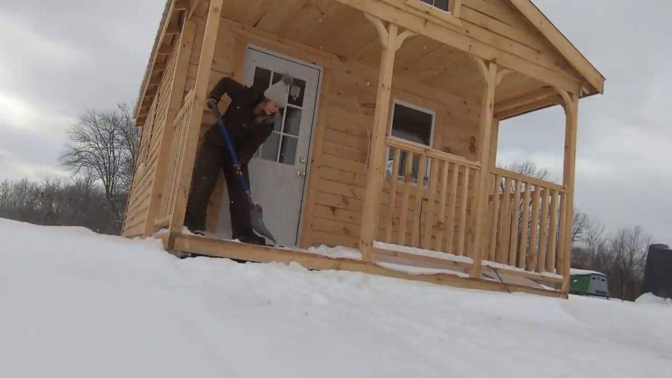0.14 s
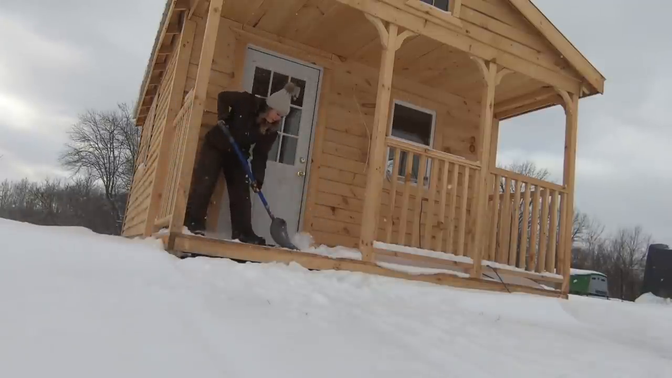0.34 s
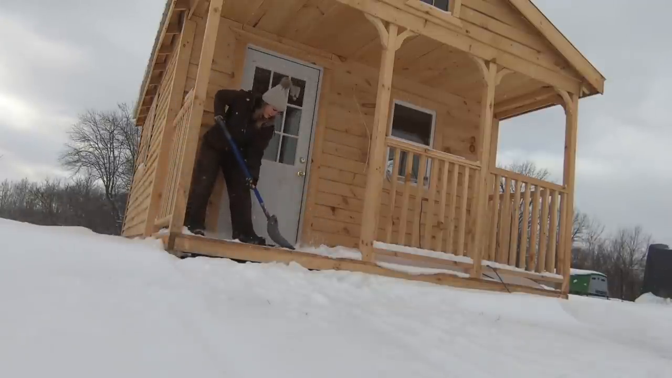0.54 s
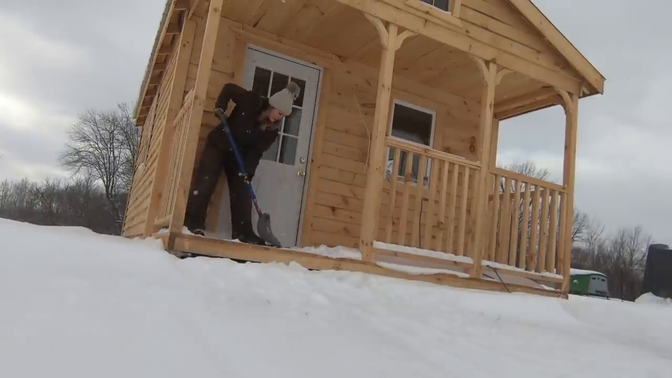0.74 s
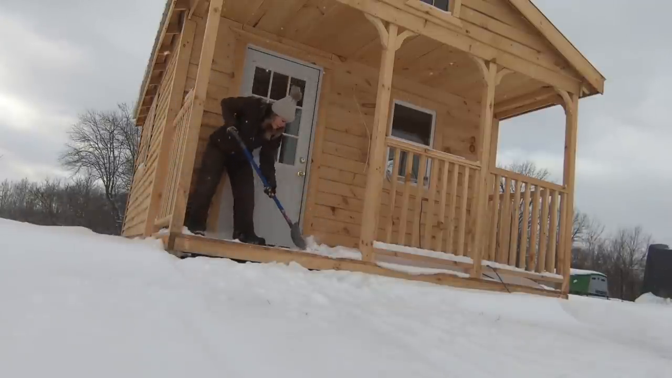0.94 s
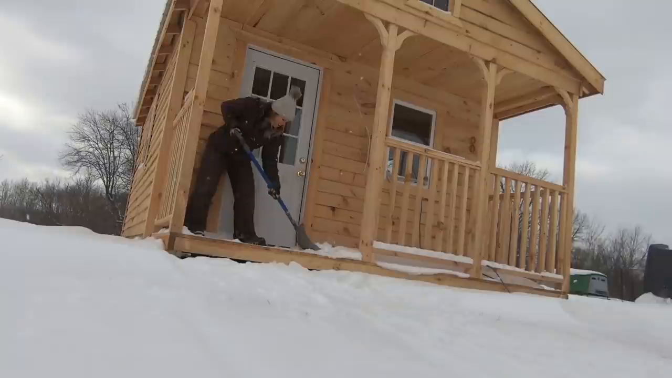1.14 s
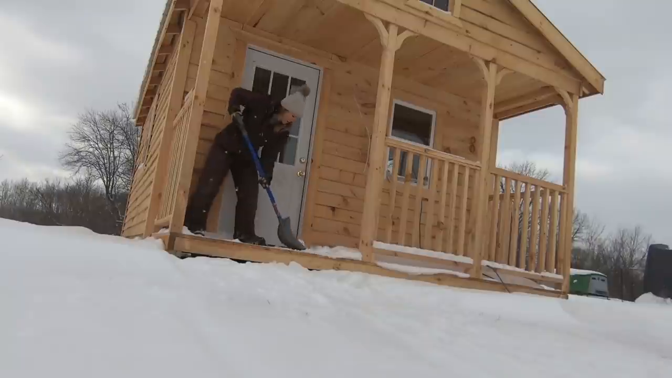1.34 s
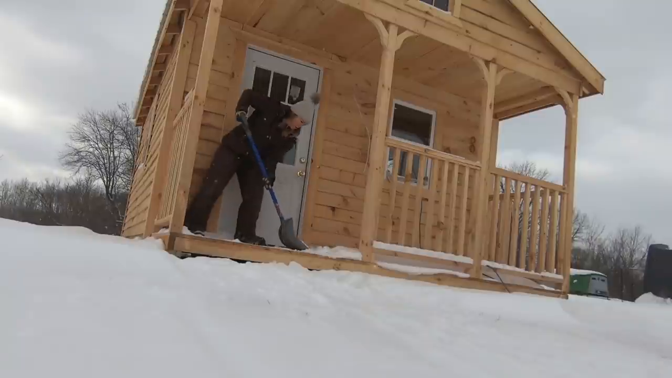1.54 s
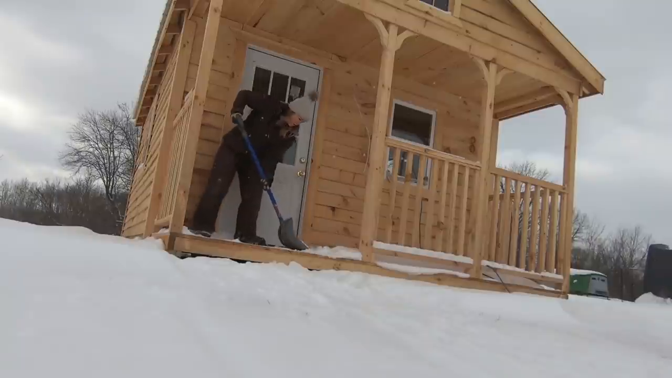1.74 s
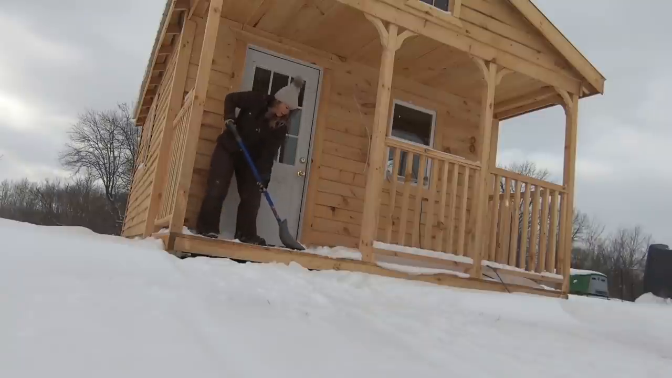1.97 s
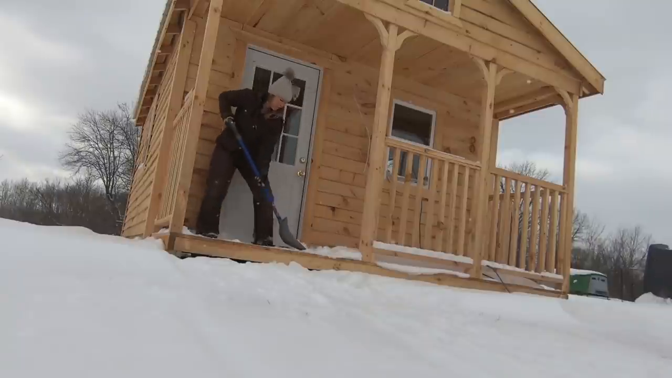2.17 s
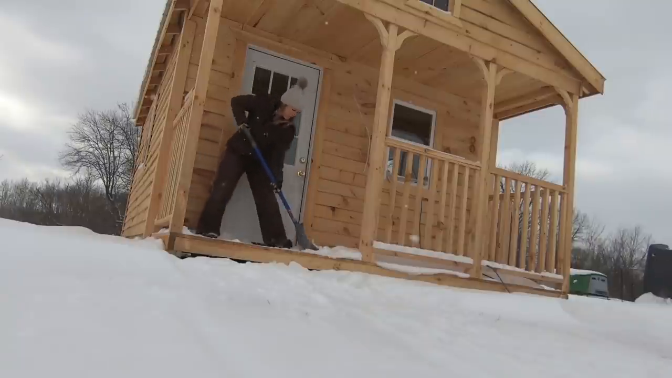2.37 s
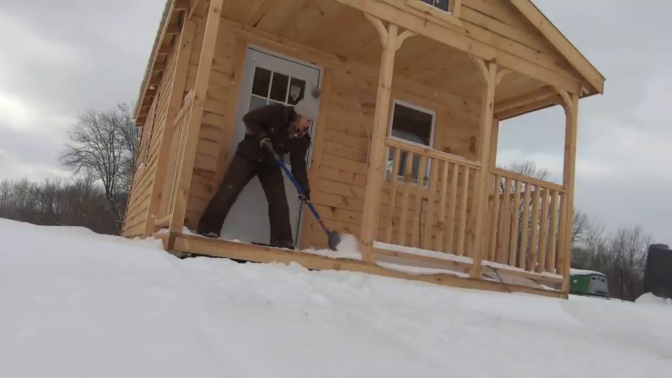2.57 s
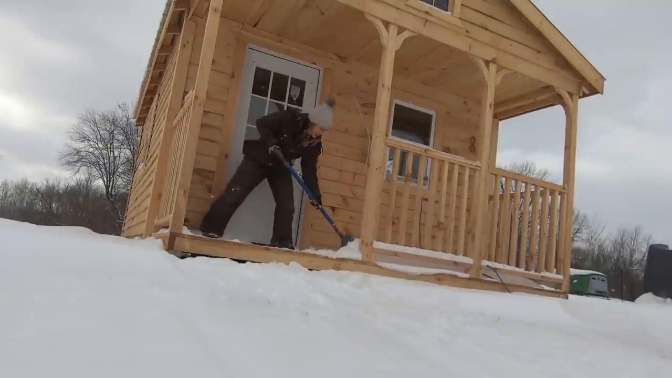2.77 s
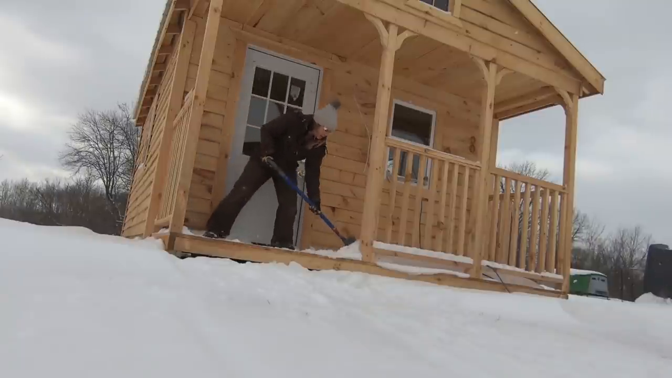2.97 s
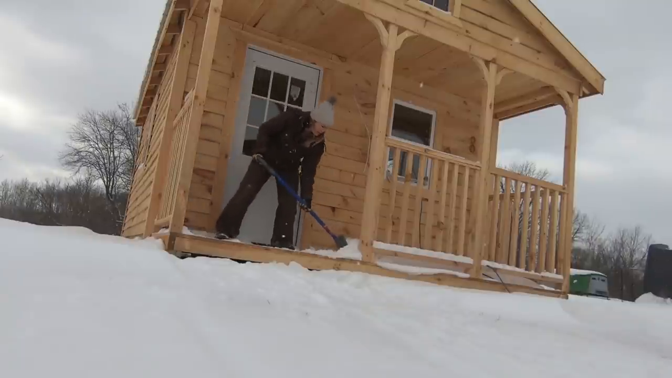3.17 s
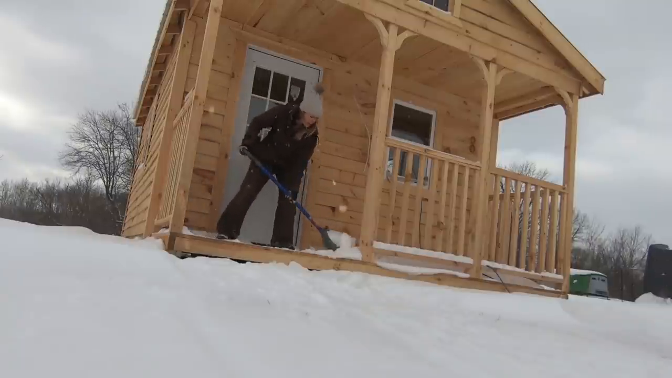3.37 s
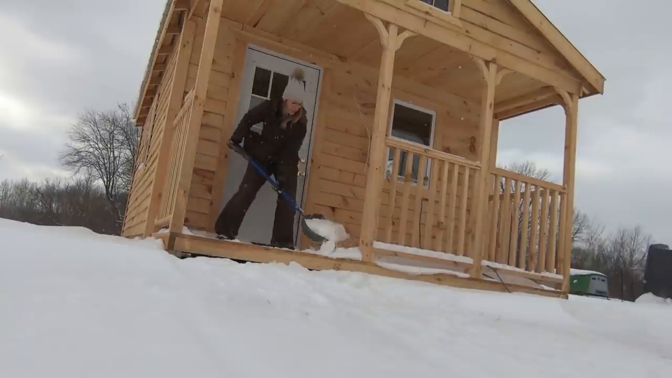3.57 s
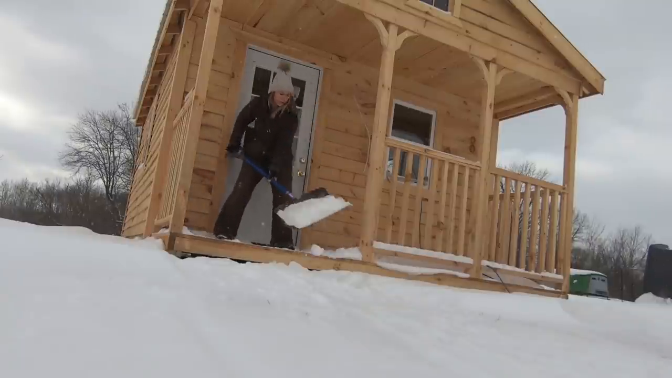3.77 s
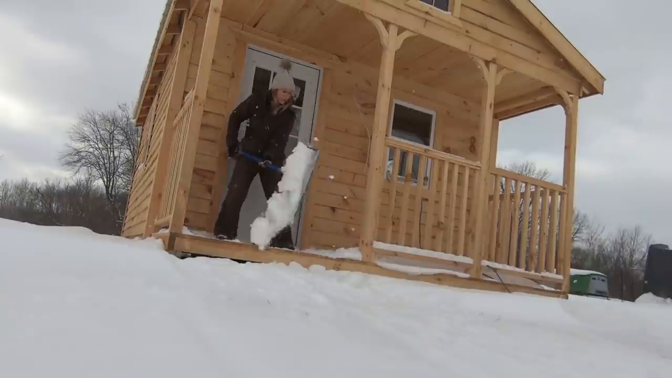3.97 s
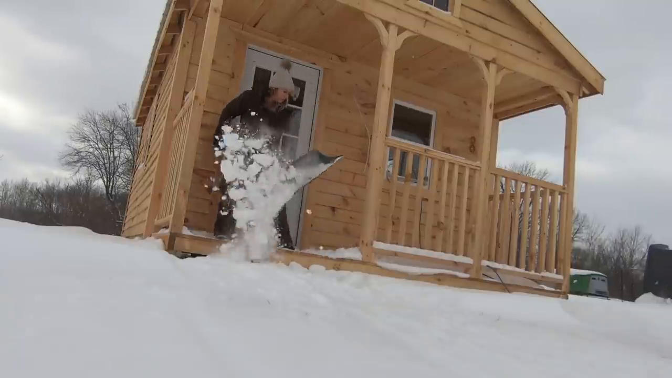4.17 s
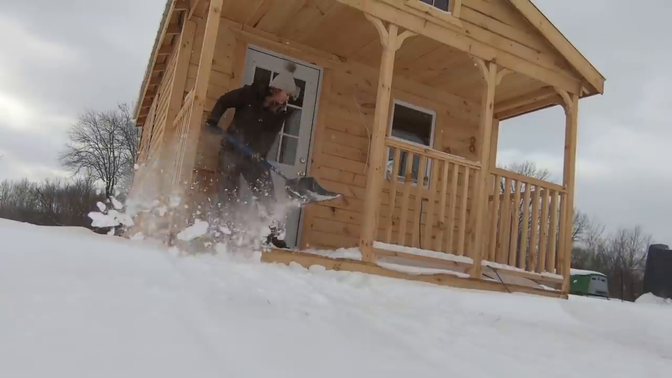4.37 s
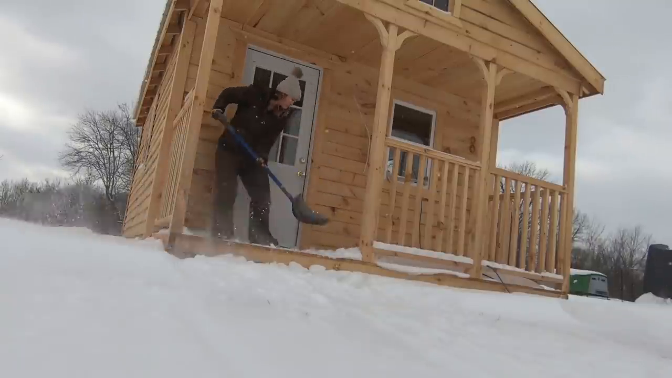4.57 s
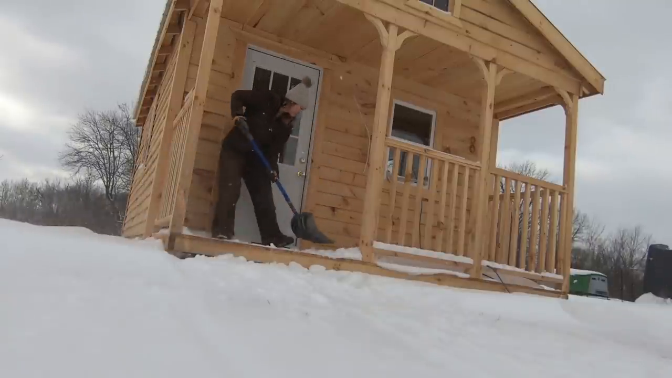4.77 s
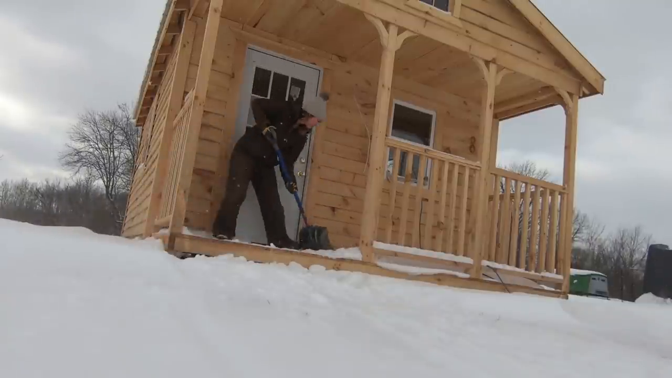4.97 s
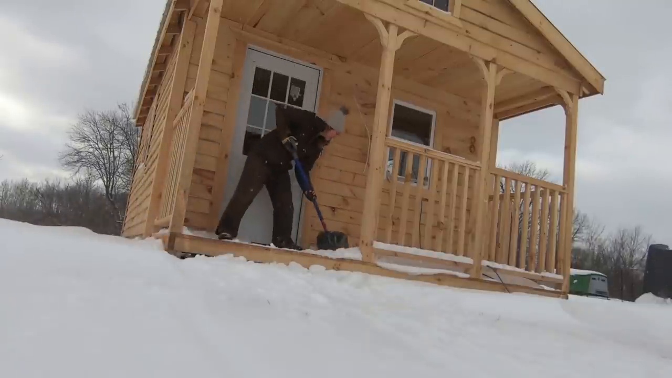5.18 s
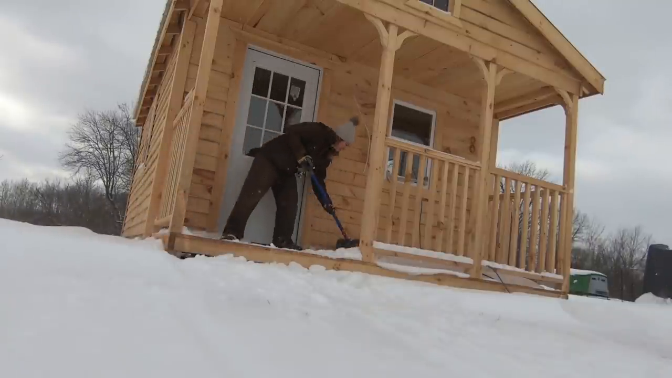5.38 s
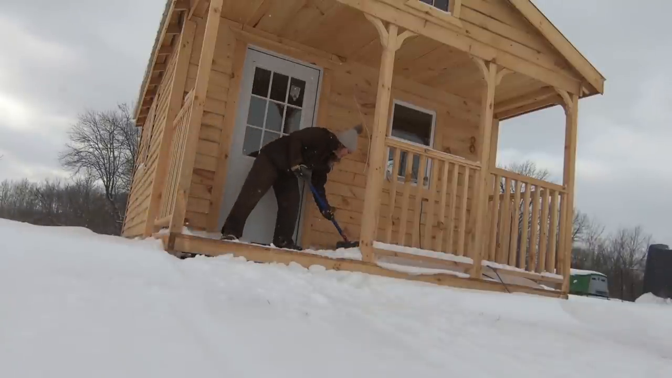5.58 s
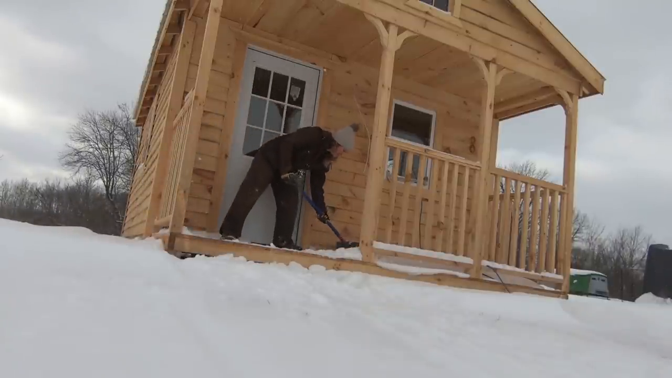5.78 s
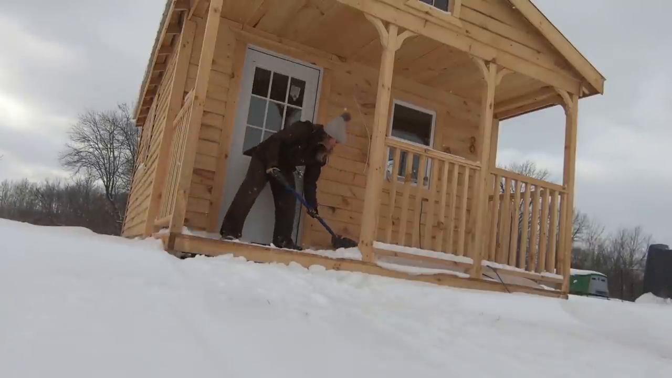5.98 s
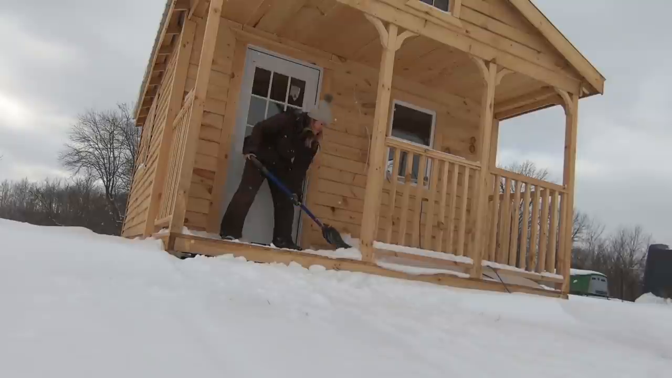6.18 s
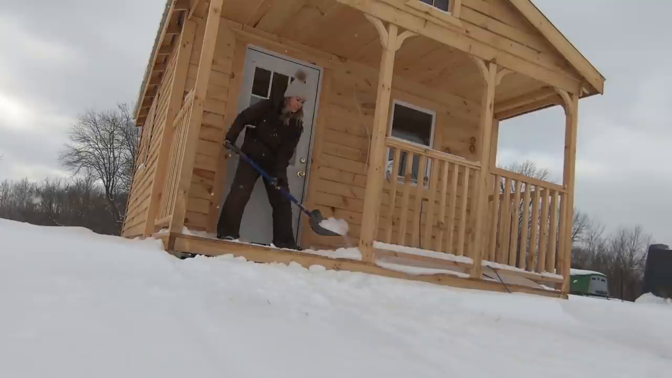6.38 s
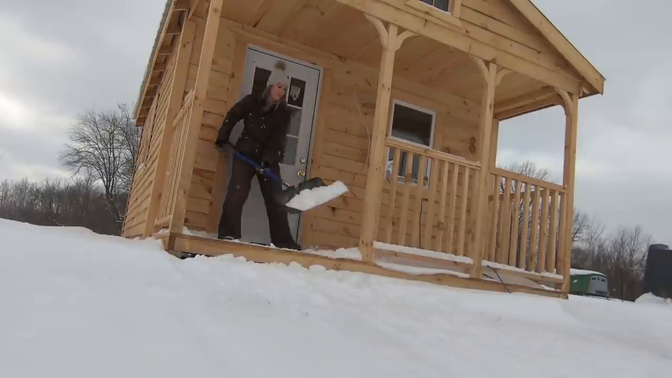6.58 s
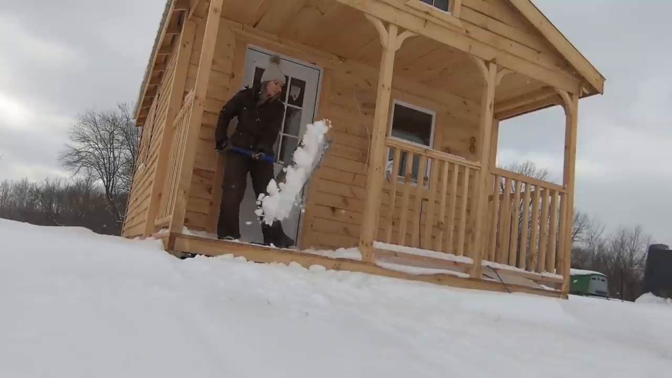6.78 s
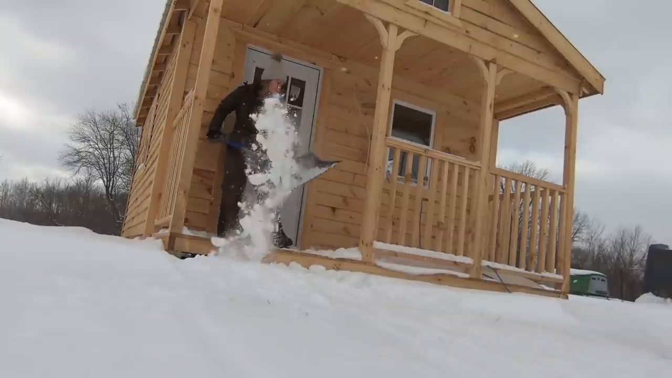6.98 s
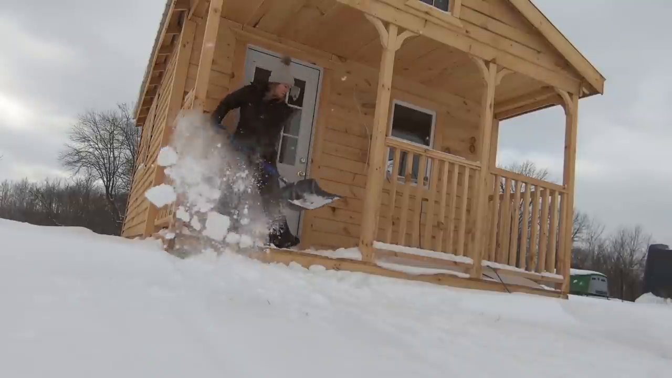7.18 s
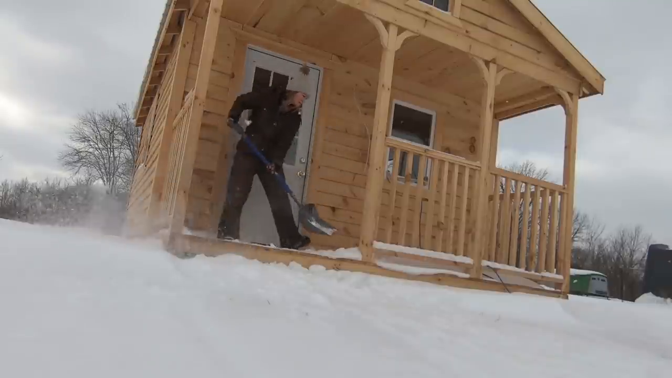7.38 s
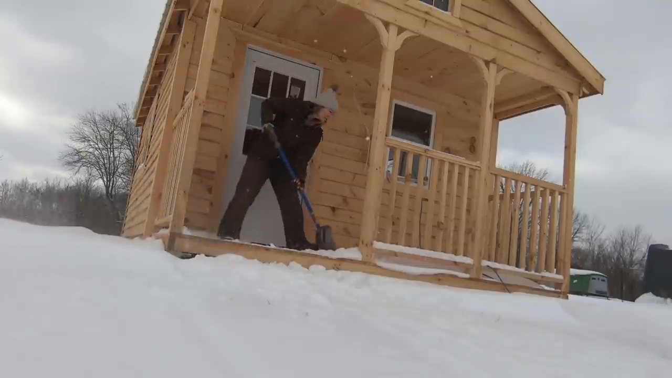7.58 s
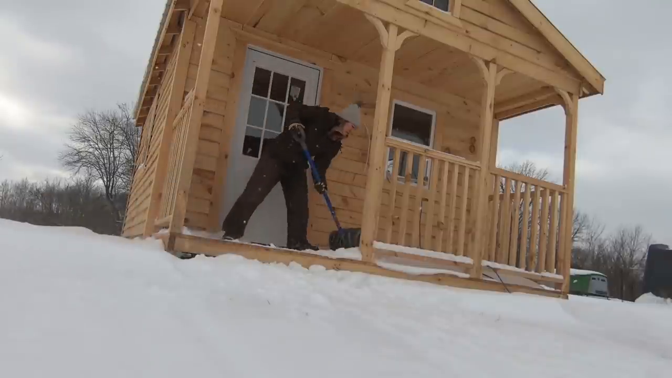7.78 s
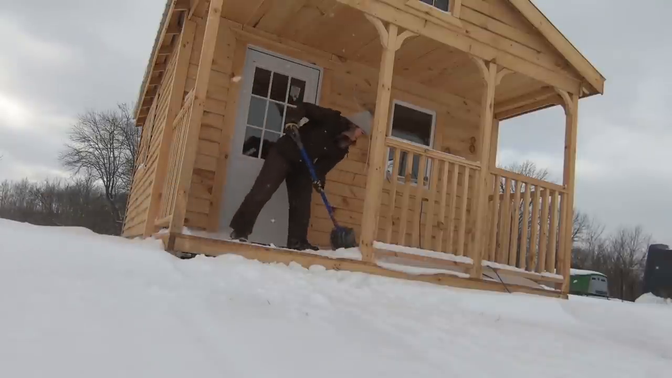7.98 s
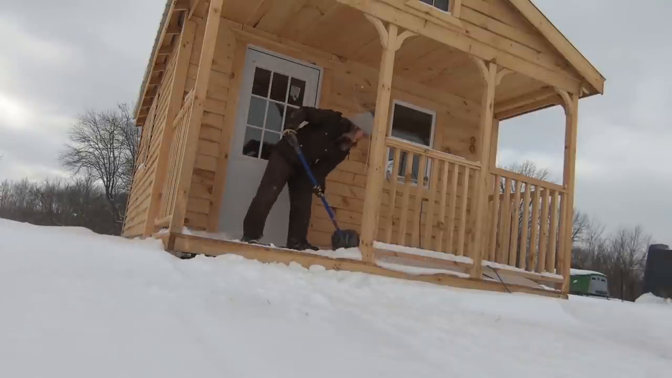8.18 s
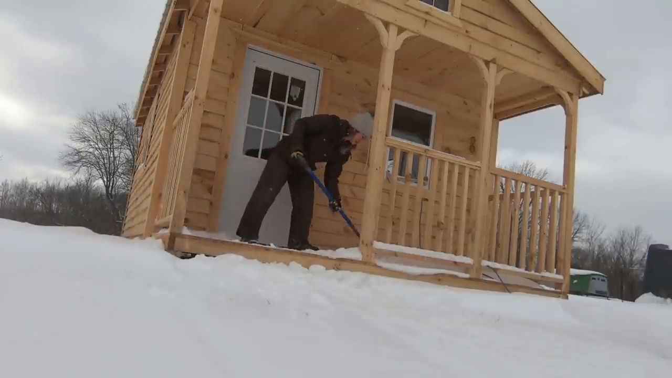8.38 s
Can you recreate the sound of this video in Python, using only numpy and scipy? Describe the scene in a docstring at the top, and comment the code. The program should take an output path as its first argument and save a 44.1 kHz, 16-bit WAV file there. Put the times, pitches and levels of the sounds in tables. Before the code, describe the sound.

Gritty shovel scrapes and woody thumps on a small porch, quiet gaps as snow is thrown, a faint distant engine hum behind.

```python
"""A snow shovel is pushed along the boards of a small wooden porch, heard from the snow below.
Crust crunches under the blade as dense random grains, coloured by faint blade and scoop resonances;
the hollow deck drums and knocks in damped modes of boards and joists, and crust and grit snap.
A far hum and engine drone, shaped noise and wavering harmonics, hang over the fields, and at first
a breeze brushes the microphone as lumpy low noise."""
import sys
import numpy as np
from scipy import signal
from scipy.fft import rfft, irfft, next_fast_len
from scipy.io import wavfile
from scipy.ndimage import uniform_filter1d

SR = 44100
rng = np.random.default_rng(int(sys.argv[2]) if len(sys.argv) > 2 else 0)


def digitize_waveform(pressure):
    """Quantize a signal to 16-bit integers and store it at the path in sys.argv[1].

    Rows of a 2-D input are taken as channels; values are limited to [-1, 1].
    """
    field = np.atleast_2d(pressure).T
    bounded = np.clip(field, -1, 1)
    quanta = np.round(bounded * 32767).astype(np.int16)
    wavfile.write(sys.argv[1], SR, quanta)


N = 371497  # length in samples


def gain_of(db):
    """Amplitude factor of a level in dB."""
    return 10 ** (np.asarray(db) / 20)


def evened(x):
    """Scale to an RMS of 1."""
    return x / np.sqrt(np.mean(x ** 2) + 1e-20)


def peaked(x):
    """Scale to a peak of 1."""
    return x / abs(x).max()


def read(points, hz):
    """Read a spectrum table between its points on a logarithmic frequency axis."""
    f, value = np.transpose(points)
    return np.interp(np.log(hz + 1), np.log(f + 1), value)


def follow(rows, t):
    """Follow each column of a time table in straight lines."""
    s, *columns = np.transpose(rows)
    return [np.interp(t, s, c) for c in columns]


def add(mix, s, sound):
    """Lay a sound into the mix from s seconds on, cut at the end."""
    part = mix[round(s * SR):][:len(sound)]
    part += sound[:len(part)]


def band(noise, order, edges_hz):
    """Band-pass a noise between two edges."""
    return signal.sosfilt(signal.butter(order, edges_hz, "band", fs=SR, output="sos"), noise)


def grit(per_s, spread_db):
    """Random tiny impacts; most are small, a few large."""
    size = gain_of(spread_db * np.minimum(rng.exponential(1, N), 5))
    struck = rng.standard_normal(N) * (rng.random(N) < per_s / SR)
    return evened(size * struck)


# snow crust crushed under the edge, relative spectrum: [f/Hz, level/dB per Hz]
CRUNCH = [(160, -13), (280, 1), (380, -6), (479, -5.5), (820, -2.5), (1190, -4), (2570, -7), (3300, -5.5),
          (6400, -18.5), (7900, -29), (9050, -30.5), (11500, -42), (15500, -50)]
# blade resonances: [f/Hz, width/Hz, level over the crunch at a ringing of 1/dB]
BLADE = [(1220, 70, 4.5), (1930, 50, 2.5), (3280, 110, 3)]
# the hollow of the scoop sings while pressed flat: [start t/s, end t/s, first f/Hz, last f/Hz]
SCOOP = [(0.246, .33, 1256, 1203), (5.363, 5.48, 1506, 950), (5.669, 5.79, 1158, 1102),
         (7.75, 7.8, 850, 800)]
SCOOP_DB, SCOOP_WIDTH_HZ = 5.5, 280
RINGING, RINGING_PER_DB = 1.2, .06  # freedom to ring at -45 dB; harder strokes ring more
LIFTED_RINGING = 0.25  # share of the ringing left to the loaded blade in the air
LOOSE_HZ, LOOSE_DB = 2330, 3.5  # snow sliding off the lifted blade gathers around one broad band


def scraping():
    """Crystals crush under the edge; the snow that loads the blade tilts the colour and damps its modes."""
    grains = grit(per_s=14000, spread_db=1.0) + 0.28 * grit(per_s=900, spread_db=1.0)
    hz, t, z = signal.stft(grains, SR, nperseg=1024, noverlap=896)
    level_db, tilt_db = contacts(t)[:2]

    ringing = np.clip(RINGING + RINGING_PER_DB * (level_db + 45), 0, 2.5)
    ringing *= 1 - (1 - LIFTED_RINGING) * lifted(t)
    modes_db = sum(db / (1 + (2 * (hz - f) / width) ** 2) for f, width, db in BLADE)
    octaves = np.log2((hz + 100) / (hz + 5000) * 3)  # the tilt flattens at both ends
    colour_db = read(CRUNCH, hz)[:, None] + np.outer(modes_db, ringing) + np.outer(octaves, tilt_db)
    loose_db = LOOSE_DB * np.exp(-np.log2((hz + 1) / LOOSE_HZ) ** 2)
    colour = gain_of(colour_db + np.outer(loose_db, lifted(t)))
    for a, b, first_hz, last_hz in SCOOP:
        glide_hz = np.interp(t, [a, b], [first_hz, last_hz])
        off = 2 * (hz[:, None] - glide_hz) / SCOOP_WIDTH_HZ
        colour *= gain_of(SCOOP_DB * ((t > a) & (t < b)) / (1 + off ** 2))
    colour /= np.sqrt((colour ** 2).mean(0))  # colour alone, no level

    # the contact point wanders: patches in frequency and time
    patches = uniform_filter1d(rng.standard_normal(z.shape), 7, 0)
    patches = evened(uniform_filter1d(patches, 10, 1))
    z = z * colour * gain_of(1.87 * patches)
    crunch = signal.istft(z, SR, nperseg=1024, noverlap=896)[1][:N]
    stutter = evened(uniform_filter1d(rng.standard_normal(N), 400))  # the edge catches and slips
    return gain_of(at_samples(count=0) + 1.02 * stutter) * evened(crunch)


# each contact of blade, boot or loose snow:
# [start t/s, rise/s, level/dB, hold/s, change over the hold/dB, brightness/dB per octave]
STROKES = [(0, 0.0025, -66.5, 0.24, -18, -3.5), (0.243, 0.03, -25.5, 0.11, -14, .5),
           (0.439, 0.021, -60.5, 0.084, 4.5, 2), (0.706, 0.008, -50.5, 0.14, -10, 2),
           (0.777, 0.02, -32, 0.035, -1.5, 1.5), (0.818, 0.049, -28, 0.22, -22, 1.5),
           (1.07, 0.097, -55.5, 0.13, -6, 0.5), (1.344, 0.013, -48.5, 0.11, 1.5, 2.5),
           (1.447, 0.024, -34, 0.08, -16, 1.5), (1.524, 0.016, -48.5, 0.092, 0.5, -9.5),
           (1.801, 0.0023, -59.5, 0.15, 14, 0.5), (1.93, 0.14, -51, 0.073, -8.5, -2.5),
           (2.303, 0.0053, -46, 0.048, -20.5, -0.5), (2.372, 0.11, -49, 0.0083, 0, 1),
           (2.434, 0.038, -33, 0.16, -8.5, 2), (2.637, 0.021, -42.5, .31, -10, .5),
           (2.975, 0.018, -58.5, 0.15, 5.5, 2.5), (3.154, 0.061, -59.5, 0.11, -12, 6),
           (3.42, 0.038, -76.5, 0.11, 2.5, 2.5), (3.588, 0.021, -61.5, 0.013, -3.5, 3),
           (3.679, 0.01, -61.5, 0.092, -4.5, -1), (3.806, 0.15, -55.5, 0.31, -26, 4),
           (4.24, 0.0045, -63.5, 0.042, -5.5, 1.5), (4.308, .012, -66.5, 0.05, -6, 7.5),
           (4.394, 0.087, -69, 0.13, 2, 6), (4.942, 0.0053, -61, 0.033, 2.5, 3),
           (4.991, 0.0065, -39.5, 0.052, 7.5, 1.5), (5.061, 0.0094, -37.5, 0.098, -7, -2),
           (5.153, 0.053, -33.5, .005, 1, -1.5), (5.218, 0.014, -40, 0.15, 0.5, 0),
           (5.372, 0.034, -39, 0.09, -5, 0.5), (5.495, 0.022, -55.5, 0.1, -9, -2),
           (5.625, 0.013, -53.5, 0.13, 9, -1.5), (5.798, 0.0097, -46, .022, -8.5, -2),
           (5.841, 0.027, -66, 0.1, 2, 4), (5.986, 0.019, -52, 0.011, -6, -4.5),
           (6.147, 0.0077, -69.5, 0.23, 18.5, -6), (6.396, 0.037, -58.5, 0.11, -14.5, -2),
           (6.51, 0.032, -62, 0.064, -1, -2), (6.584, 0.04, -51, 0.12, 1, -5),
           (6.739, 0.014, -48, 0.24, -32, -3.5), (7.363, 0.0063, -61, 0.028, -11.5, 9.5),
           (7.46, .01, -67, 0.16, 5.5, 2), (7.61, 0.061, -37, 0.11, 3, 4.5),
           (7.737, 0.011, -34.5, 0.049, -5, -3), (7.815, 0.016, -34.5, 0.069, -10.5, -1.5),
           (7.906, .005, -37, 0.066, -3.5, -9.5), (7.982, 0.0082, -39, 0.03, -10.5, -9),
           (8.003, 0.047, -70.5, 0.17, 23.5, 4), (8.208, 0.018, -41.5, 0.1, 3, 5),
           (8.328, 0.012, -40, 0.09, -9.5, 0)]
RISE_DB = 24  # climbed over the last nine tenths of the rise
RELEASE_DB_PER_S = 450.5  # fall once the hold ends
RUSTLE_DB = -78  # loose snow and clothes while the blade is lifted
DULL_SHAKE = 0.71  # extra shake of the deck, dB per dB of dullness


def contacts(t):
    """All strokes together: level/dB, brightness led by the loudest, shaking of the deck/dB."""
    s, rise, db, hold, change_db, tilt_db = np.transpose(STROKES)[:, :, None]
    rise, hold = np.maximum(rise, .002), np.maximum(hold, .002)
    since = t - s - rise
    climb_db = RISE_DB * np.log10(np.clip(1 + since / rise, 1e-4, 1))
    held_db = change_db * np.clip(since / hold, 0, 1)
    release_db = RELEASE_DB_PER_S * np.maximum(since - hold, 0)
    level_db = db + climb_db + held_db - release_db
    power = gain_of(2 * np.maximum(level_db, -130))  # twice the dB gives power
    total_db = 10 * np.log10(power.sum(0) + lifted(t) * gain_of(2 * RUSTLE_DB))
    brightness = (power * tilt_db).sum(0) / power.sum(0)
    return total_db, brightness, total_db - DULL_SHAKE * brightness - 12 * lifted(t)


def at_samples(count):
    """One result of contacts, drawn sample by sample through millisecond steps."""
    t = np.arange(0, N / SR + .01, .001)
    return np.interp(np.arange(N) / SR, t, contacts(t)[count])


# the blade is off the deck: [start t/s, end t/s]
LIFTED = [(3.3, 4.93), (6.04, 7)]


def lifted(t):
    """1 while the blade is in the air, 0 on the deck, with 15 ms ramps."""
    return sum(np.clip(np.minimum(t - a, b - t) / 0.015, 0, 1) for a, b in LIFTED)


# the bare edge hisses thinly: [start t/s, end t/s, level/dB]
RASPS = [(3.087, 3.25, -58.5), (4.241, 4.269, -65)]


def rasp():
    """A narrow hiss of the bare edge: band-passed noise with 10 ms ramps."""
    t = np.arange(N) / SR
    hiss = evened(band(rng.standard_normal(N), 2, [3200, 3850]))
    level = sum(gain_of(db) * np.clip(np.minimum(t - a, b - t) / .01, 0, 1) for a, b, db in RASPS)
    return level * hiss


# damped modes of the deck boards: [f/Hz, relative level/dB, undamped-by-stretch t60/s]
BOARDS = [(151.8, -1.5, 0.19), (193, 3.5, 0.12), (225.4, 0.5, 0.31), (266.2, -6, 0.13), (407, -10.5, 0.06)]
# damped modes of the joists below: [nominal f/Hz, relative level/dB, t60 before any stretch/s]
JOISTS = [(44.7, -15, 0.43), (63.8, 7.5, 0.27), (89, 3.5, 0.41), (115.9, 0, 0.27)]
BOARDS_DB, JOISTS_DB = -9.5, -8.5  # beside the shaking of the deck
BOARDS_REST_DB, JOISTS_REST_DB = -66, -76  # floor of the drumming


def ring(modes, stretch=1):
    """What a tap leaves in a set of damped modes; stretch scales their decay times."""
    t = np.arange(SR // 2) / SR
    return sum(gain_of(db - 60 * t / (t60 * stretch)) * np.sin(2 * np.pi * hz * t)
               for hz, db, t60 in modes)


def drumming():
    """Uneven bumps keep the boards and the joists under them sounding; a harder stroke drums louder."""
    stroke, deck = gain_of(at_samples(count=0) - 7), gain_of(at_samples(count=2))
    boards = evened(signal.oaconvolve(grit(per_s=400, spread_db=0.5), ring(BOARDS))[:N])
    joists = evened(signal.oaconvolve(grit(per_s=200, spread_db=3.5), ring(JOISTS, .5))[:N])
    slow = uniform_filter1d(deck, 3000)  # the heavy joists respond sluggishly
    boards_power = stroke ** 2 + (gain_of(BOARDS_DB) * deck) ** 2 + gain_of(2 * BOARDS_REST_DB)
    joists_gain = np.hypot(gain_of(JOISTS_DB) * slow, gain_of(JOISTS_REST_DB))
    return np.sqrt(boards_power) * boards + joists_gain * joists


# blows of blade or boot on the deck:
# [t/s, boards reference level/dB, struck spot f/Hz, joists peak level/dB]
KNOCKS = [(0.273, -28, 215, -42), (0.317, -25, 220, -25), (0.723, -38.5, 194, -42), (0.802, -44, 218, -47),
          (0.855, -29, 164, -33), (0.907, -25.5, 218, -33), (1.485, -26, 248, -40), (1.616, -39, 230, -46),
          (1.843, -30, 129, -41), (2.302, -42, 210, -45), (2.387, -35, 154, -69), (2.432, -40, 232, -35),
          (2.478, -38, 270, -30), (4.993, -18.5, 158.5, -26.5), (5.201, -24.5, 218.5, -31.5),
          (5.476, -19.5, 140, -31.5), (5.538, -29, 163, -35.5), (5.799, -37, 195, -39),
          (5.998, -43, 216, -60), (6.747, -33, 207, -57), (7.311, -34, 189, -54.5), (7.765, -9, 187, -19),
          (7.796, -20, 121, -25.5), (7.843, -31, 215, -26), (7.941, -35, 282.6, -30),
          (7.992, -35, 277, -39)]


def knocks():
    """Each blow: the struck board for a few cycles, its neighbours, the joists swelling after."""
    out, t = np.zeros(N), np.arange(SR // 8) / SR
    swell = 1 - np.exp(-np.arange(SR // 2) / 600)
    for s, db, hz, joists_db in KNOCKS:
        spot = np.sin(2 * np.pi * hz * t) * (t / 0.0089) * np.exp(1 - t / 0.0062)
        add(out, s, gain_of(db) * spot)
        # neighbours sound weaker the further they are in pitch
        near = [(f, mode_db - 9 * abs(np.log2(f / hz)), t60) for f, mode_db, t60 in BOARDS]
        add(out, s + 0.0042, gain_of(db - 7.5) * peaked(ring(near, 0.46)))
        # weight on the deck detunes the joists
        shaken = [(f * rng.uniform(0.878, 1.232), mode_db + 2.0 * rng.standard_normal(), t60)
                  for f, mode_db, t60 in JOISTS]
        add(out, s, gain_of(joists_db) * peaked(ring(shaken) * swell))
    return out


# small snaps of crust and grit: [t/s, peak level/dB, f/Hz]
SNAPS = [(1.9464, -41, 1670), (3.599, -54, 1620), (3.686, -51, 2400), (3.946, -38, 2900),
         (3.9564, -38, 2000), (4.527, -47, 2270), (4.5597, -45.5, 2080), (4.58, -48, 2100),
         (4.597, -46, 2100), (4.602, -52, 6500), (4.948, -43, 3650), (5.994, -39.5, 726),
         (6.162, -46, 3170), (6.306, -44, 1850), (6.374, -42, 1810), (6.426, -41.5, 1310),
         (6.5302, -41, 3000), (6.589, -47, 1800), (7.37, -45, 5460), (7.615, -43, 3030), (7.761, -21, 810),
         (7.763, -18, 3500)]


def snaps():
    """A sharp break and a few milliseconds of crumbs around a pitch; low snaps last longer."""
    out, t = np.zeros(N), np.arange(SR // 30) / SR
    for s, db, hz in SNAPS:
        edges_hz = np.clip([hz / 1.6, hz * 1.48], 100, 10000)
        crumbs = rng.standard_normal(len(t)) * np.exp(-t * hz / 5)
        crumbs[0] = 10.0  # the break itself
        add(out, s, gain_of(db) * peaked(band(crumbs, 2, edges_hz)))
    return out


# far hum and hiss, relative spectrum: [f/Hz, level/dB per Hz]
HUM = [(25, -37), (116, -28.5), (140, -4.5), (227, -5), (270, -19.5), (368, -21), (450, -36), (803, -24),
       (1080, -38.5), (2550, -37.5), (9500, -52.5), (11000, -83), (15500, -97)]
# swell of hum and drone: [t/s, level/dB]
HUM_SWELL = [(0, -67), (2.8, -58.5), (3.5, -64.5), (4.1, -63), (4.5, -53), (4.9, -57.5), (6, -59.5),
             (7, -59.5), (8.42, -60.5)]


def hum():
    """Far, dull drone with faint hiss above it: shaped noise whose low part swells."""
    hz, t, z = signal.stft(rng.standard_normal(N), SR, nperseg=2048)
    low = (hz[:, None] > 110) / (1 + (hz[:, None] / 450) ** 2)  # only the low drone swells
    swell_db = follow(HUM_SWELL, t)[0]
    z = z * gain_of(read(HUM, hz)[:, None] + low * (swell_db - swell_db.mean()))
    return gain_of(swell_db.mean()) * evened(signal.istft(z, SR, nperseg=2048)[1][:N])


# harmonics of a far engine: [multiple of the firing rate, level beside the hum swell/dB]
DRONE = [(2, -3.5), (3, -5.5), (4, -20)]
DRONE_HZ, DRONE_WAVER = 75.7, .012  # firing rate and the share of it by which it wavers


def drone():
    """A few harmonics of the far engine, each fading in and out on its own, swelling with the hum."""
    steps = rng.standard_normal((len(DRONE) + 1, N // 5000 + 2))  # one step every 5000 samples
    drift = [np.interp(np.arange(N) / 5000, np.arange(len(row)), row) for row in steps]
    turns = np.cumsum(DRONE_HZ * (1 + DRONE_WAVER * drift[-1])) / SR
    tones = sum(gain_of(db + 2.9 * fade) * np.sin(2 * np.pi * round(k) * turns)
                for (k, db), fade in zip(DRONE, drift))
    return gain_of(follow(HUM_SWELL, np.arange(N) / SR)[0]) * tones


# breeze on the microphone ports: [t/s, left level/dB, right level/dB]
BREEZE = [(0, -51, -43), (.15, -71, -82), (.45, -34.5, -42), (.58, -59.5, -67.5), (.7, -36, -52),
          (1.0, -51, -53), (1.15, -39, -59), (1.39, -34.5, -46), (1.43, -53.5, -54), (1.7, -46.5, -67),
          (2.1, -42, -39.5), (2.22, -66, -79.5), (3.2, -92, -90)]


def breeze():
    """Lumpy low buffeting, unrelated at the two ports."""
    air = evened(band(rng.standard_normal((2, N)), 3, [38, 105]))
    lumps = evened(uniform_filter1d(rng.standard_normal((2, N)), 2000))
    return gain_of(np.array(follow(BREEZE, np.arange(N) / SR)) + 1.26 * lumps) * air


def ports(mid, scattered, side_db):
    """Left and right from the sound ahead plus and minus its scattered part."""
    size = next_fast_len(N)
    hz = np.fft.rfftfreq(size, 1 / SR)
    turned = 1j * rfft(scattered, size)  # a quarter turn: no pull to one side
    side = irfft(turned * gain_of(read(side_db, hz)), size)[:N]
    return np.array([mid + side, mid - side])


# stereo width of the porch sounds: [f/Hz, side minus mid level/dB]
PORCH_SIDE = [(60, -29.5), (160, -52), (290, -25.5), (640, -15.5), (1220, -10.5), (3300, -21.5),
              (5500, -10.5), (9000, -3)]
# stereo width of the hum: [f/Hz, side minus mid level/dB]
HUM_SIDE = [(60, -20), (200, -7), (450, 2.5), (1000, 7), (3300, -1)]


def scene():
    """The porch lies ahead, a hair to the left; the hum comes from all around."""
    blows = knocks() + snaps() + rasp()
    porch = [blows + scraping() + drumming() for _ in range(2)]  # ahead and scattered
    ahead = ports(*porch, PORCH_SIDE) * gain_of([[.1], [-.1]])
    return ahead + ports(hum(), hum(), HUM_SIDE) + drone() + breeze()


PORT_HZ, PORT_WIDTH_HZ, PORT_DB = 9050, 1000, 3  # port resonance; level of the added band
EDGE_HZ = 15600  # upper band limit


def record(dry):
    """The microphone drops the deepest bass and lifts its port resonance; then the band limit."""
    thin = signal.sosfilt(signal.butter(2, 42, "high", fs=SR, output="sos"), dry)
    resonance = signal.lfilter(*signal.iirpeak(PORT_HZ, PORT_HZ / PORT_WIDTH_HZ, SR), thin)
    lowpass = signal.firwin(511, EDGE_HZ, window=("kaiser", 9), fs=SR)
    return signal.oaconvolve(thin + gain_of(PORT_DB) * resonance, lowpass[None], "same")


dry = scene()
out = record(dry)
digitize_waveform(out)
```